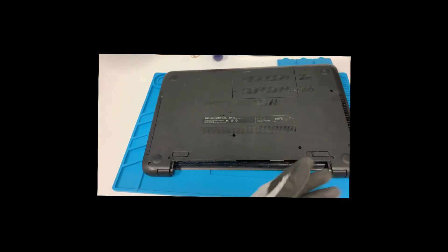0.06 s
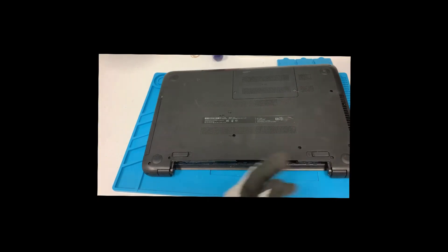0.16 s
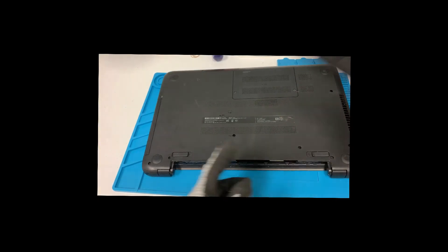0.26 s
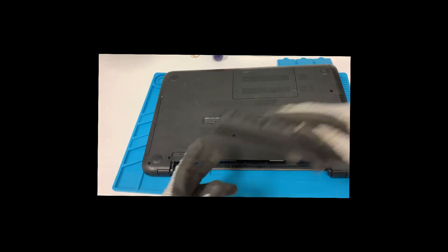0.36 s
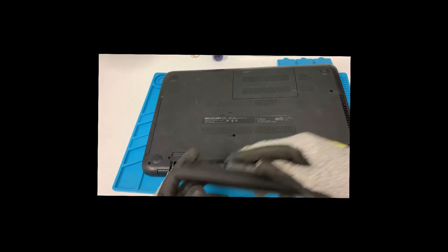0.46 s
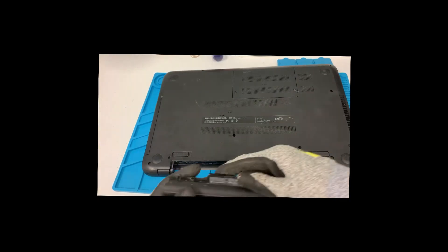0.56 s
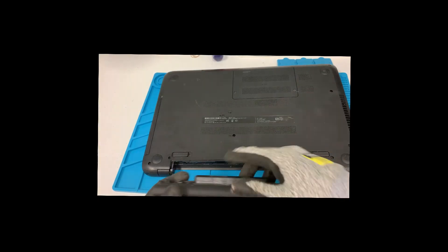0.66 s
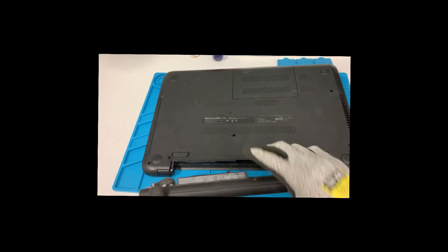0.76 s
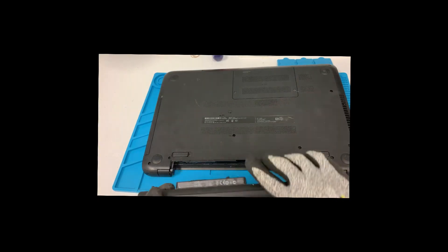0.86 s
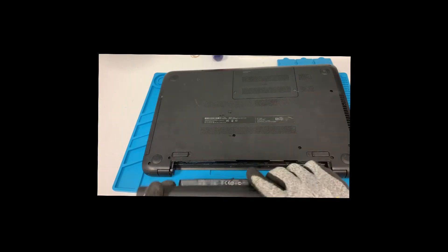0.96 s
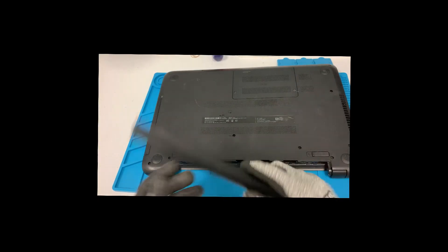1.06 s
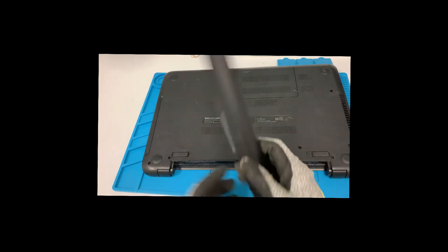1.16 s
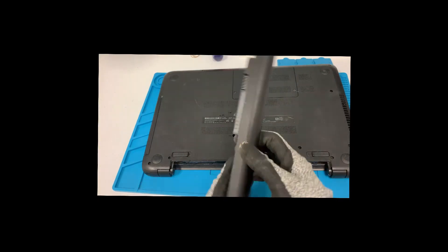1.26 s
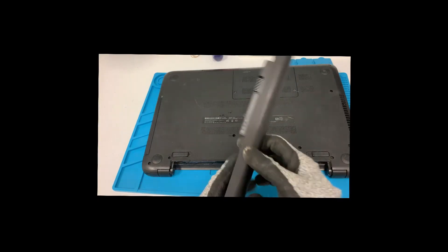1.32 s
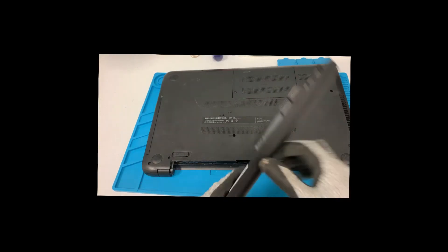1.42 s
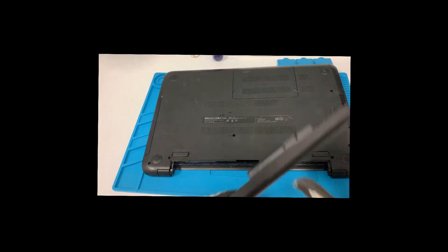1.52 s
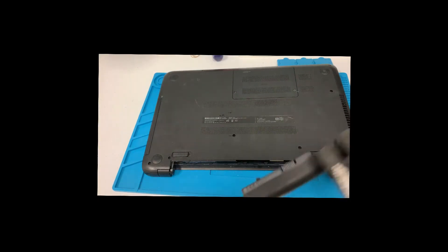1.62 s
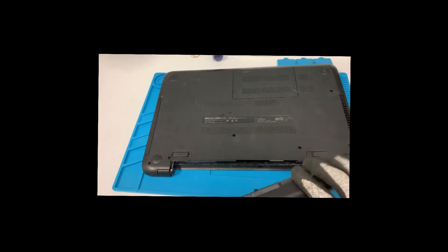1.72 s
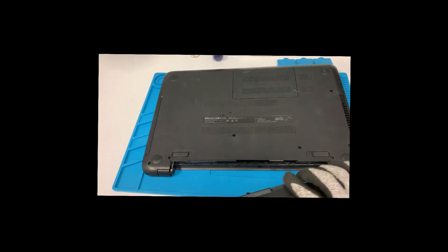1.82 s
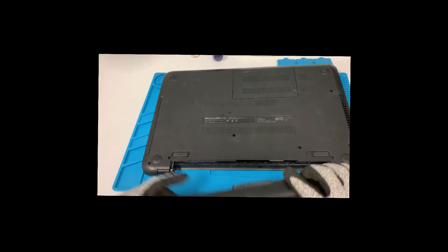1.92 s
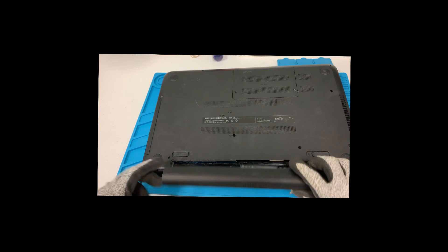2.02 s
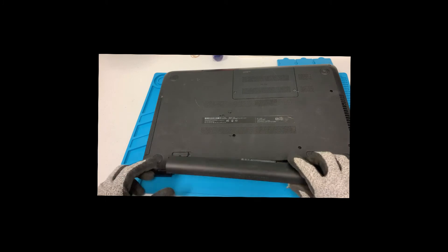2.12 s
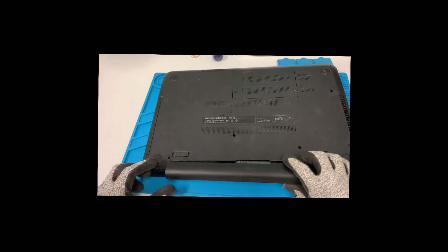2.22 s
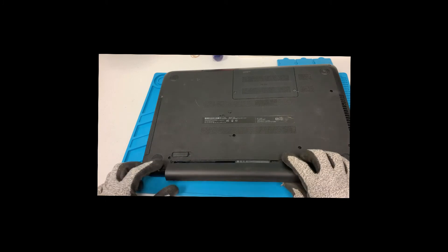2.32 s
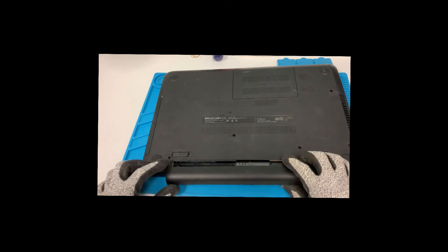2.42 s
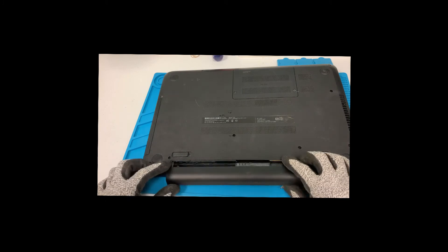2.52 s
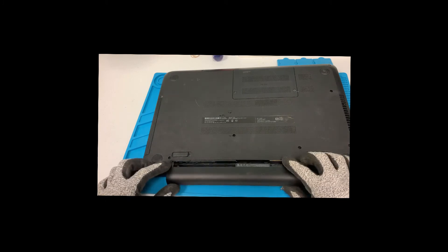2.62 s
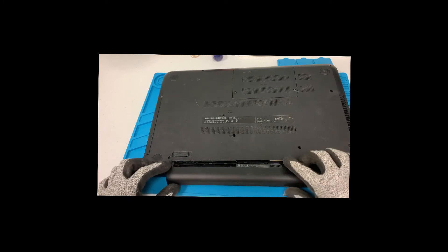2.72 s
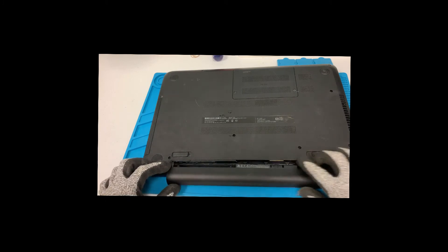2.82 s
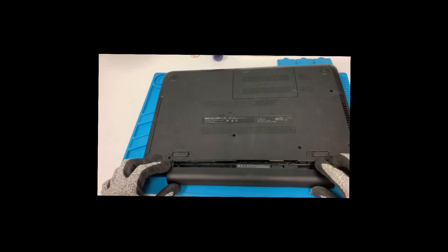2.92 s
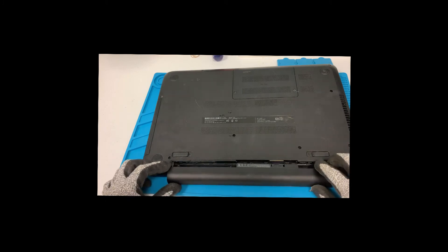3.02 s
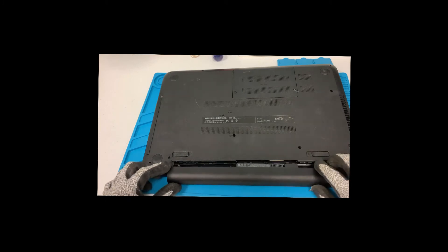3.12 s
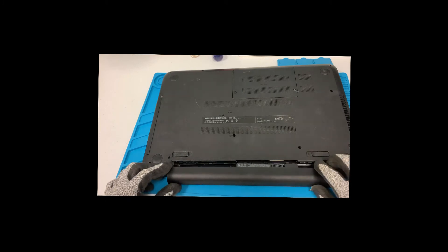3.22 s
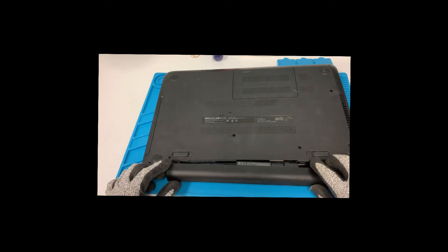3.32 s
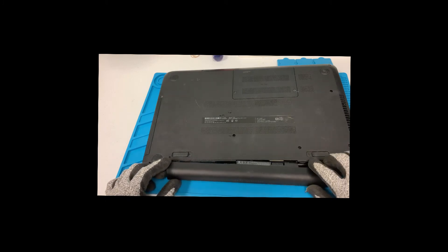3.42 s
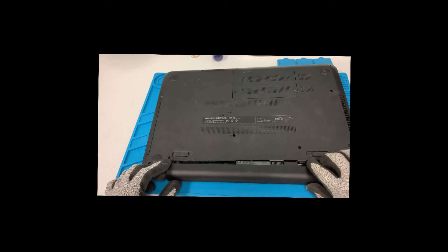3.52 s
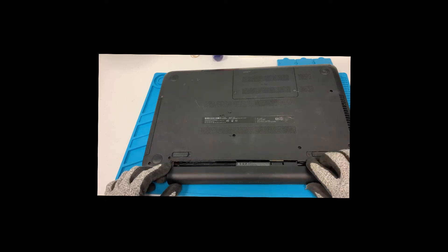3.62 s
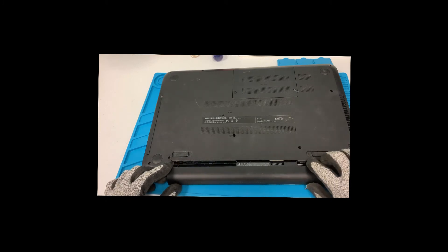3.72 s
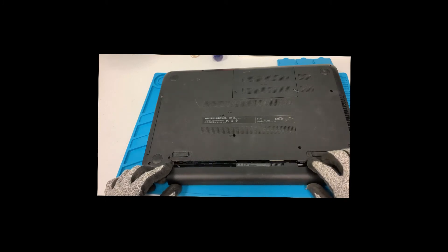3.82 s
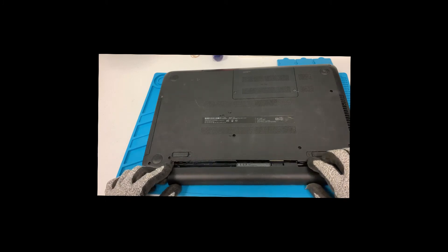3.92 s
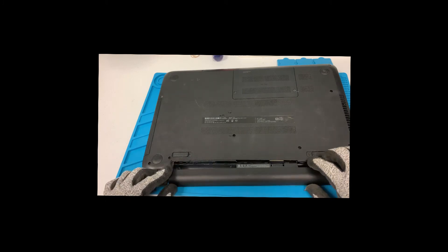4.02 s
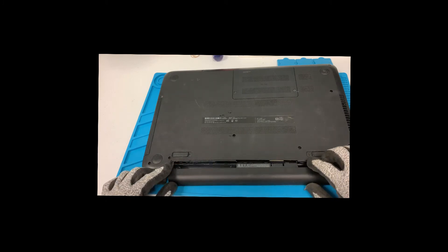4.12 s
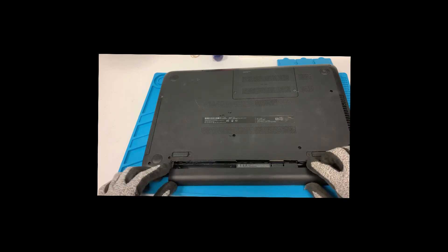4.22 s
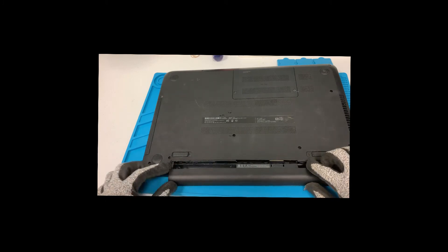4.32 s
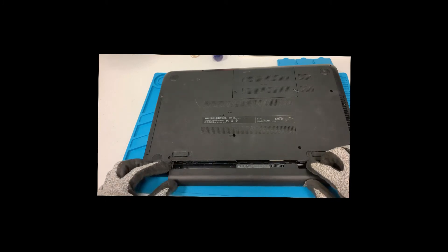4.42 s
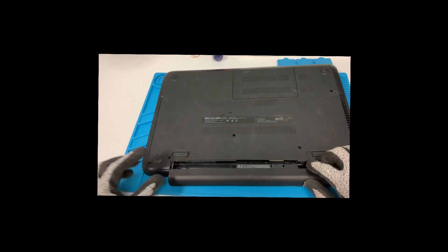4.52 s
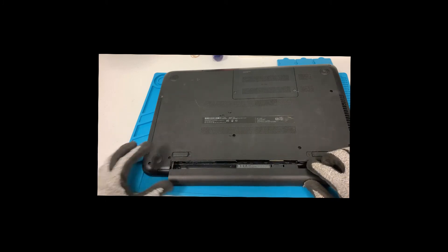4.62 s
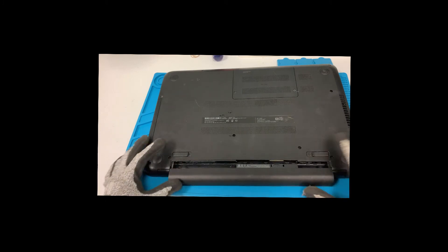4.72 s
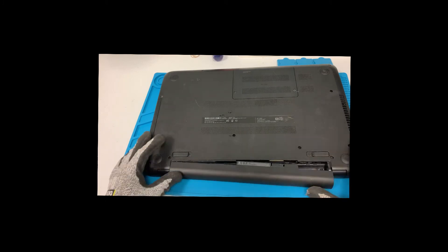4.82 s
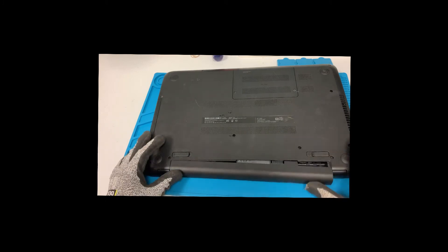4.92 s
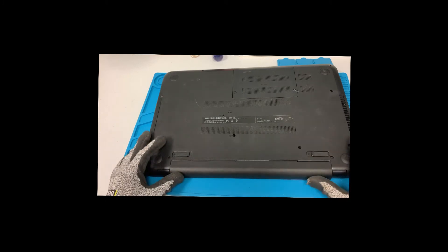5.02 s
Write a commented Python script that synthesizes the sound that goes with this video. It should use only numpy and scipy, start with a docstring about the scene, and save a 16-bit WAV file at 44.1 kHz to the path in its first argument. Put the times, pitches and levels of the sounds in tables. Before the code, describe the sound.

In a small room with ventilation humming softly, a laptop battery is handled close by. A short scuff with a tiny squeak gives way to light plastic taps and glove rustle. From about two seconds in, sharper separate clicks come with low knocks through the bench, and near the end a tight run of snaps and a thump seats the battery.

```python
"""At a workbench in a small room, gloved hands turn a laptop battery over and push it into its bay.
Plastic strikes plastic, and each impact rings the modes of the case as a click. Knocks cross the bench
top as dispersive bending waves and arrive as late, falling thumps. Friction makes the case scrape and
squeak and the gloves rustle. The room reverberates briefly, and ventilation hums behind it all."""
import sys
import numpy as np
from scipy import signal
from scipy.fft import rfft, irfft, next_fast_len
from scipy.io import wavfile
from scipy.ndimage import map_coordinates

SR = 44100
rng = np.random.default_rng(int(sys.argv[2]) if len(sys.argv) > 2 else 0)


def generate_wav(sig):
    """Save sig (samples, or channels by samples) to the path in sys.argv[1] as 16-bit PCM at SR."""
    pcm = np.round(np.clip(np.atleast_2d(sig).T, -1, 1) * 32767).astype(np.int16)
    wavfile.write(sys.argv[1], SR, pcm)


N = 223071

# modes of the plastic case: f/Hz, bandwidth/Hz, level/dB
CASE_MODES = [(596, 530, -4.5), (900, 238, 1.5), (1290, 504, -0.5), (1802, 755, 1), (2100, 368, 1.5),
              (2700, 670, -11), (3447, 456, -7), (3887, 400, -11)]
# spectrum of glove fabric and sharp edges: f/Hz, relative level/dB
BRIGHT_SPECTRUM = [(1200, -26), (2000, -13.5), (3000, -10.5), (4000, -6.5), (5300, -12.5), (6000, -7),
                   (7000, -4.5), (8500, -10.5), (10000, -27), (11000, -12.5), (12500, -14.5),
                   (13600, -18.5), (14400, -34.5)]


def clicks():
    """Impact excitation: parts graze, crack and rattle, driving the case's modes and its bright edges."""
    # contacts of plastic on plastic: t/s, peak level/dB, favoured f/Hz, relative treble level/dB
    contacts = [(.9666, -51, 2080, -19), (1.034, -49, 1200, -17), (1.269, -61, 2820, -15),
                (1.341, -44, 1420, -5), (1.415, -48, 2450, -5.5), (1.443, -54, 2230, -9),
                (1.756, -43.5, 1440, -3.5), (1.959, -40.5, 1780, -2), (2.276, -22.5, 3630, -6),
                (2.278, -29, 1290, -15), (2.5194, -42, 1810, -21), (2.775, -35, 1200, -18),
                (2.798, -27.5, 1110, -11), (2.8131, -38, 2290, -11.5), (3.015, -49.5, 925, -7.5),
                (3.0856, -52, 1420, -9.5), (3.6377, -42.5, 1600, -15.5), (3.8644, -43, 870, -22),
                (4.05, -27.5, 2030, -17.5), (4.098, -32, 1390, -23), (4.105, -35.5, 1520, -30),
                (4.1811, -45.5, 2040, -19), (4.5372, -31, 3500, 1.5), (4.5386, -45, 1200, -29),
                (4.833, -26.5, 3050, -19), (4.842, -37, 1500, -12), (4.854, -31, 2480, -9.5),
                (4.857, -23.5, 1650, -18), (4.8605, -32, 750, -21.5), (4.877, -35, 1680, -23),
                (4.894, -31.5, 840, -9.5), (4.9198, -37, 820, -8.5), (4.9868, -37.5, 1460, -10.5),
                (5.0396, -32, 1470, -17), (5.049, -27.5, 2800, -10), (5.0518, -21, 1490, -16)]
    graze_db, graze_rise_s, edge_rise_s = -15, 0.034, 0.0407  # rises of 60 dB
    crack_t60_s, rattle_db, rattle_t60_s = 0.0081, -12, 0.062
    lead = 1024  # samples before the crack
    out, t = np.zeros(N + SR), (np.arange(SR // 8) - lead) / SR
    graze = amp(graze_db + 60 * np.minimum(t, 0) / graze_rise_s)
    decay = amp(-60 * np.abs(t) / crack_t60_s) + amp(rattle_db - 60 * np.abs(t) / rattle_t60_s)
    for s, db, pitch_hz, treble_db in contacts:
        force = np.where(t < 0, graze, decay) * rng.standard_normal((2, len(t)))
        force[1, t < 0] *= amp(60 * t[t < 0] / edge_rise_s)  # only the graze's end reaches the treble
        force[:, lead] = 2.95  # the crack itself: one clean impulse
        body = unit(filtered(force[0], case_response(pitch_hz, spread_octaves=0.54, db_per_octave=1)))
        edge = unit(filtered(force[1], coloured(BRIGHT_SPECTRUM)))
        out[round(s * SR):][:len(t)] += amp(db) * (body + amp(treble_db) * edge) / np.abs(body).max()
    return out[lead:][:N]


def case_response(pitch_hz, spread_octaves, db_per_octave=0):
    """Modal weighting: the touched spot favours modes near its pitch; hard contact favours high ones."""
    modes = resonant(CASE_MODES, scatter_db=1)
    spot = lambda f: amp(-6.5) + np.exp(-.5 * (np.log2((f + 1) / pitch_hz) / spread_octaves) ** 2)
    tilt = lambda f: amp(db_per_octave * np.log2(np.clip(f, 500, 4500) / pitch_hz))
    return lambda f: modes(f) * spot(f) * tilt(f)


def bench_blows():
    """Inelastic impacts: a set-down object rocks, losing energy at each blow; single knocks follow."""
    # blows that reach the bench top: t/s, level/dB, tilt towards the higher mode groups/dB
    knocks = [(2.275, -36, -3), (2.283, -39.5, -3.5), (2.776, -42, -2), (2.797, -37, 1), (2.809, -36, -3.5),
              (3.018, -56.5, 6.5), (3.411, -57, 6.5), (3.641, -45.5, -1), (3.674, -44, -2.5),
              (3.865, -52.5, 5.7), (3.905, -50.5, -4), (4.049, -46, -7), (4.099, -38.5, 0.7),
              (4.534, -43.5, 8), (4.831, -50, 10.5), (4.853, -25, 3), (4.864, -40, 3.5), (4.892, -43, 5),
              (4.912, -36.5, -3), (5.032, -39.5, 5.5)]
    first_db, loss_db = np.array([-24, -18, -25]), np.array([3.5, 6, 3])  # low, middle, high modes
    gaps_s = 0.0168 * 1.2 ** np.arange(6)
    times = -0.012 + np.cumsum(gaps_s) - gaps_s
    rocking = [(s, first_db - k * loss_db) for k, s in enumerate(times)]
    return rocking + [(s, (db - tilt_db, db + 1, db + tilt_db)) for s, db, tilt_db in knocks]


def bench_thumps():
    """Dispersion: bending waves travel as the root of frequency, so a blow's low end arrives last."""
    # modes of the bench top: f/Hz, bandwidth/Hz, level/dB
    bench_modes = [(60.7, 30, -9.5), (82.8, 22, -7), (117.9, 10, 3.5), (165.6, 11, -6), (206, 23.6, -10),
                   (283, 28.6, -11.5), (354.6, 36, -10), (485, 110, -15.5), (661, 98, -17)]
    middle_band_hz, delay_at_1hz_s = (100, 170), 0.0769
    lead = 2048  # samples before time zero, where the rocking starts
    out, t = np.zeros(N + SR), np.arange(SR // 3) / SR
    travel = lambda f: np.exp(-4j * np.pi * delay_at_1hz_s * np.sqrt(f))
    groups = np.searchsorted(middle_band_hz, [mode[0] for mode in bench_modes])
    for s, group_levels in bench_blows():
        force = (t == 0) + amp(-26 - 60 * t / 0.13) * rng.standard_normal(len(t))  # push, uneven contact
        for group, db in enumerate(group_levels):
            wood = resonant([mode for mode, g in zip(bench_modes, groups) if g == group], scatter_db=1)
            thump = filtered(force, lambda f: wood(f) * travel(f) / (1 + 1j * f / 500) ** 2)
            out[lead + round(s * SR):][:len(t)] += amp(db) * thump / np.abs(thump).max()
    return out[lead:][:N]


def scuffs():
    """Sliding friction: each rub swells and fades, its grains sounding in the case and in the treble."""
    # rubs of glove on the case, then duller scrapes of plastic on plastic:
    # peak t/s, level/dB, rise/s, fall/s, favoured f/Hz, relative treble level/dB
    rubs = [(.02, -43.5, 0.092, 0.11, 900, -30), (.068, -41, 0.22, 0.13, 1760, -12),
            (0.27, -62, 0.16, 0.067, 3620, -17), (0.384, -66.5, 0.17, 0.1, 2100, -6.5),
            (.572, -62.5, 0.031, 0.073, 1800, -1.5), (0.692, -66, 0.3, 0.15, 2100, -7),
            (0.829, -57.5, 0.025, 0.12, 2360, -2), (1.02, -63, 0.095, 0.035, 1960, -12.5),
            (1.094, -53.5, 0.041, 0.031, 2700, -1), (1.221, -72.5, 0.079, 0.063, 1720, -3.5),
            (1.309, -68, 0.15, 0.11, 2460, -8.5), (1.495, -64, 0.12, 0.069, 2100, -4),
            (1.776, -59.5, 0.049, 0.065, 1520, -2), (1.853, -61.5, 0.13, 0.046, 1640, -6.5),
            (1.96, -52.5, 0.2, 0.11, 1530, -7), (2.043, -66.5, .032, 0.05, 2800, 4.5),
            (2.33, -47, 0.032, 0.053, 1240, -15), (2.51, -48.5, 0.057, 0.066, 1250, -17),
            (2.679, -73.5, 0.32, 0.72, 1420, -18), (2.931, -62, 0.074, 0.12, 1410, -11.5),
            (3.06, -60, .068, 0.075, 770, -27), (3.377, -54, 0.033, 0.14, 1680, -22.5),
            (3.538, -73.5, 0.12, 0.075, 1740, -12), (3.655, -57, 0.11, 0.075, 1770, -19.5),
            (3.689, -56.5, 0.2, .049, 1500, -23), (4.027, -62.5, .02, 0.098, 1700, -13),
            (4.082, -45.5, 0.033, 0.028, 1570, -14), (4.21, -73.5, .053, 0.13, 1720, -18),
            (4.344, -73, 0.13, 0.063, 1360, -13), (4.461, -67.5, 0.096, 0.11, 1550, 0),
            (4.506, -63.5, 0.049, .03, 1700, -10), (4.736, -72.5, 0.044, 0.034, 1390, 2.5)]
    lead = SR // 8
    out, t = np.zeros(N + SR), (np.arange(SR // 3) - lead) / SR
    grains = amp(2.2 * wobble(150) + 1.4 * wobble(60))
    for s, db, rise_s, fall_s, pitch_hz, treble_db in rubs:
        stroke = amp(db - 36.9 * np.where(t < 0, -t / rise_s, t / fall_s))
        grip = grip_ripple()
        case_noise, treble_noise = [filtered(white, grip) for white in rng.standard_normal((2, len(t)))]
        body = unit(filtered(case_noise, case_response(pitch_hz, spread_octaves=0.43)))
        # each rub has its own treble colour
        spectrum = [(hz, level + rng.normal(0, 2.5)) for hz, level in BRIGHT_SPECTRUM]
        treble = unit(filtered(treble_noise, coloured(spectrum)))
        out[round(s * SR):][:len(t)] += stroke * (body + amp(treble_db) * treble)
    return grains * out[lead:][:N]


def grip_ripple(depth_db=2.6, spacing_hz=450):
    """Weak resonances: each grip puts its own random peaks and dips in the spectrum."""
    knots = rng.standard_normal(SR // spacing_hz)
    return lambda f: amp(depth_db * map_coordinates(knots, [f / spacing_hz]))


def squeaks():
    """Stick-slip: a roughly periodic slip gives narrow noise bands at a pitch and two overtones."""
    # squeaks: peak t/s, level/dB, time to fall 20 dB/s, f/Hz, relative overtone level/dB
    slips = [(.065, -42, 0.029, 1760, -31), (0.451, -75.5, 0.16, 1480, -30), (1.089, -56, 0.023, 1320, 2),
             (1.762, -57, 0.014, 1346, 3)]
    relative_width, lead = 0.05, SR // 8
    out, t = np.zeros(N + SR), (np.arange(SR // 3) - lead) / SR
    for s, db, fall_s, hz, overtone_db in slips:
        partials = (hz, 0), (2 * hz, overtone_db), (3 * hz, overtone_db - 10.5)
        comb = lambda f: sum(amp(level) * np.exp(-.5 * ((f - centre) / (relative_width * centre)) ** 2)
                             for centre, level in partials)
        tone = unit(filtered(rng.standard_normal(len(t)), comb))
        out[round(s * SR):][:len(t)] += amp(db - 20 * (t / fall_s) ** 2) * tone
    return out[lead:][:N]


def handling():
    """Friction noise in uneven grains: the case colours the scrape, and the gloves rustle higher."""
    # course of the case's scrape: t/s, level/dB
    scrape_levels = [(0, -45), (.11, -57.5), (.37, -81.5), (1.07, -86.5), (1.39, -72.5), (1.54, -83.5),
                     (1.8, -88.5), (1.93, -68), (2.08, -87), (2.44, -76.5), (2.58, -93), (2.82, -67.5),
                     (2.94, -68), (3.17, -80), (3.41, -84.5), (4.06, -81), (4.45, -78.5), (4.66, -92),
                     (4.87, -71.5), (4.97, -57.5), (5.0, -57), (5.06, -45)]
    rustle_db = -11
    level_db = np.interp(np.arange(N) / SR, *np.transpose(scrape_levels))
    grip = wobble(60)
    case_friction = amp(grip + 1.3 * wobble(400)) * rng.standard_normal(N)
    glove_friction = amp(0.53 * grip + 1.3 * wobble(720)) * rng.standard_normal(N)
    scrape = unit(filtered(case_friction, resonant(CASE_MODES)))
    rustle = unit(filtered(glove_friction, coloured(BRIGHT_SPECTRUM)))
    return amp(level_db) * (scrape + amp(rustle_db) * rustle)


def room(x):
    """Reverberation: each stretch of sound gets a diffuse tail whose decay depends on frequency."""
    # reverberation time of the small room: f/Hz, T60/s
    decay_times = [(200, 0.38), (1500, 0.14), (4000, 0.23), (12000, 0.18)]
    out, step, delay = np.zeros(N + SR), SR // 4, 150
    for start in range(0, N, step):
        hz, t, noise = signal.stft(rng.standard_normal(SR // 2), SR, nperseg=256)
        decay = amp(-60 * t / along(decay_times, hz)[:, None])
        tail = signal.istft(noise * decay, SR, nperseg=256)[1]
        wet = signal.fftconvolve(x[start:start + step], tail / np.linalg.norm(tail))
        out[start + delay:][:len(wet)] += wet
    return out[:N]


def ventilation(hum_db=-51, hiss_db=-84.5):
    """Ambient noise: the ventilation's low hum swells a little beneath a steady hiss."""
    # spectrum of the ventilation: f/Hz, relative level/dB
    hum_spectrum = [(12, -45.5), (20, -22), (43, -0.5), (66, 3.5), (87, -15), (103, -1.5), (123, -0.5),
                    (161, -6), (173, -21), (243, -13.5), (410, -26.5), (441, -26), (700, -45.5),
                    (910, -85.5), (1540, -120)]
    # spectrum of the still air's hiss: f/Hz, relative level/dB
    hiss_spectrum = [(350, -8), (600, -46), (1060, 3.5), (1160, -42), (1420, 7.5), (1580, -4.5),
                     (2540, -34.5), (6180, -5), (9830, -25.5), (11800, -4.5), (14200, -12.5)]
    hum = unit(filtered(rng.standard_normal(N), coloured(hum_spectrum)))
    hiss = unit(filtered(rng.standard_normal(N), coloured(hiss_spectrum)))
    swell = amp(.8 * wobble(3))
    return amp(hum_db) * swell * hum + amp(hiss_db) * hiss


def resonant(modes, scatter_db=0):
    """Modal superposition: damped resonances of alternating sign, with optional scatter in strength."""
    gains = amp(scatter_db * rng.standard_normal(len(modes)))
    return lambda f: sum((-1) ** k * gains[k] * amp(db) * 1j * f * bw / (hz * hz - f * f + 1j * f * bw)
                         for k, (hz, bw, db) in enumerate(modes))


def coloured(spectrum):
    """Zero-phase response through points of f/Hz, level/dB."""
    return lambda hz: amp(along(spectrum, hz))


def filtered(x, response):
    """Linear filtering: the spectrum of x times a complex frequency response."""
    size = next_fast_len(len(x) + SR // 2)
    return irfft(rfft(x, size) * response(np.fft.rfftfreq(size, 1 / SR)), size)[:len(x)]


def along(points, hz):
    """Interpolation of points on a logarithmic frequency axis."""
    f, values = np.transpose(points)
    return np.interp(np.log(hz + 1), np.log(f + 1), values)


def wobble(rate):
    """Smooth random modulation, rate knots a second."""
    return map_coordinates(rng.standard_normal(int(N * rate / SR) + 4), [np.arange(N) * rate / SR])


def amp(db):
    """Amplitude ratio of a level in dB."""
    return 10 ** (np.asarray(db) / 20)


def unit(x):
    """x at rms 1."""
    return x / np.sqrt(np.mean(x ** 2) + 1e-20)


def scene():
    """Superposition: the direct sound of every source, plus reverberation of the clicks and rubs."""
    impacts, rubs = clicks(), scuffs() + squeaks()
    reverberation = room(amp(-6) * impacts + amp(-7) * rubs)
    return (impacts + rubs + reverberation + bench_thumps() + handling() + ventilation())[None]


def record(dry):
    """Microphone response: a deep, narrow notch in the treble and nothing above the band limit."""
    notch_hz, width_hz, limit_hz = 9800, 900, 14500
    notch = lambda f: (notch_hz ** 2 - f * f) / (notch_hz ** 2 - f * f + 1j * f * width_hz)
    return filtered(dry[0], lambda f: notch(f) * (f < limit_hz))[None]


dry = scene()
out = record(dry)
generate_wav(out)
```